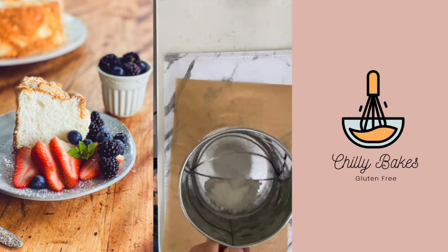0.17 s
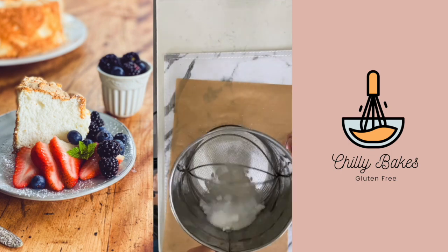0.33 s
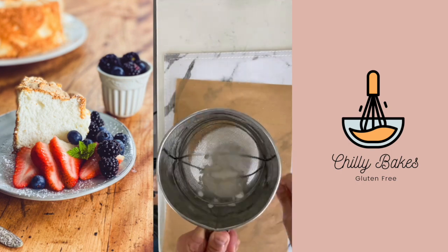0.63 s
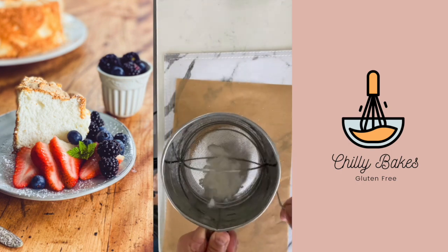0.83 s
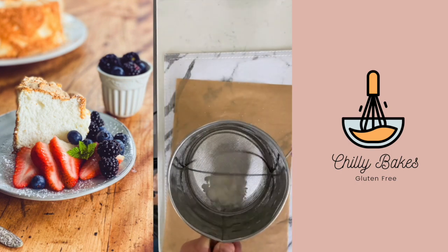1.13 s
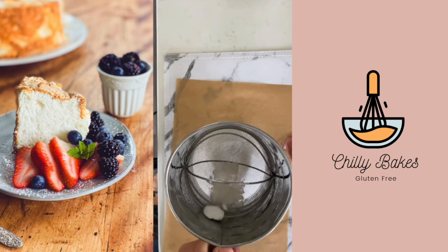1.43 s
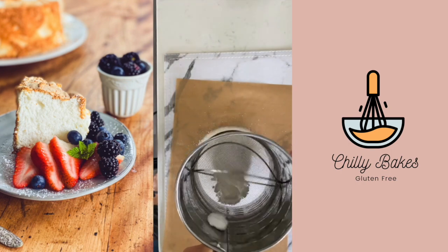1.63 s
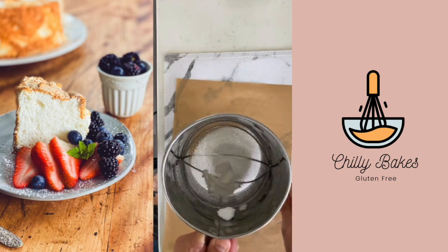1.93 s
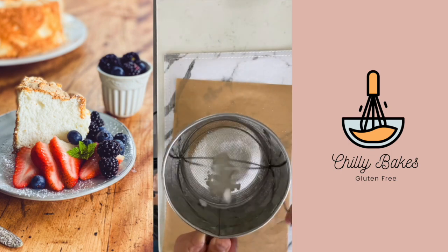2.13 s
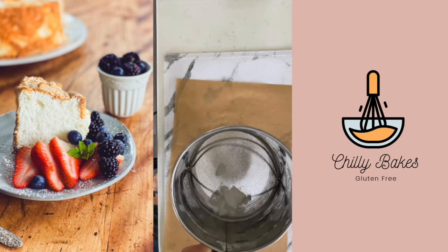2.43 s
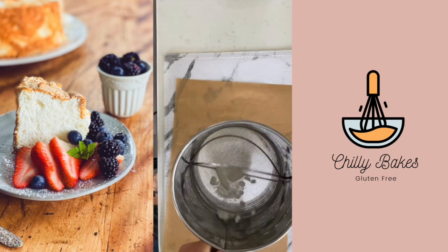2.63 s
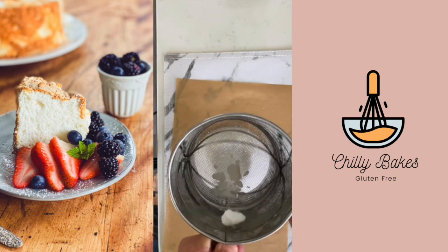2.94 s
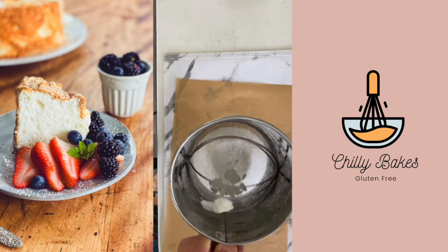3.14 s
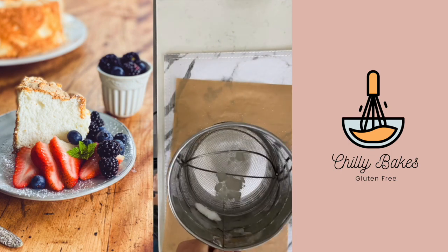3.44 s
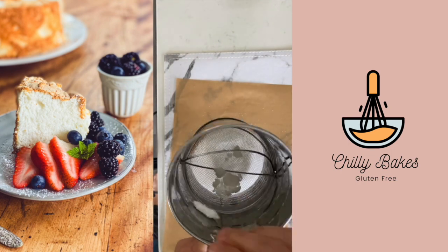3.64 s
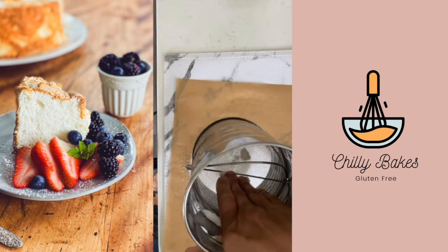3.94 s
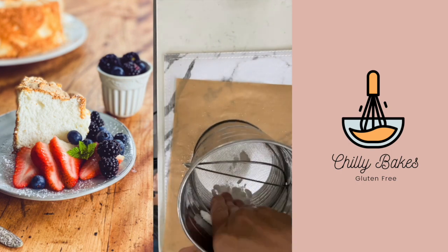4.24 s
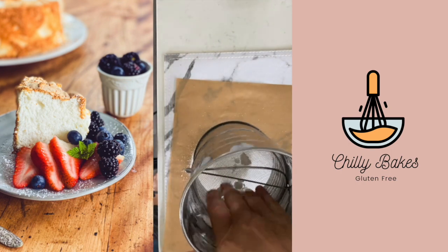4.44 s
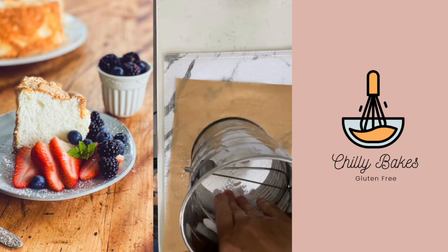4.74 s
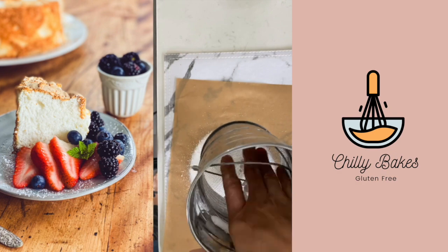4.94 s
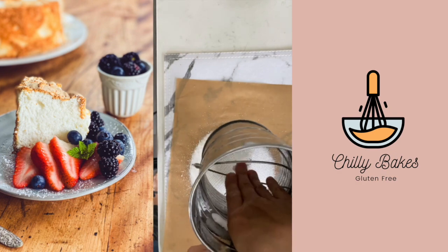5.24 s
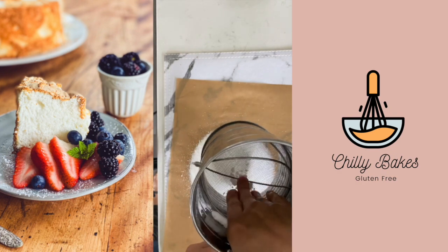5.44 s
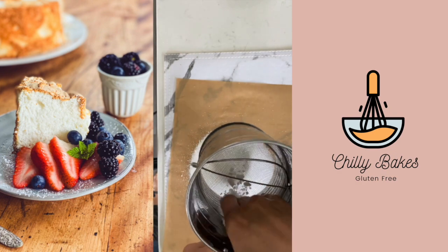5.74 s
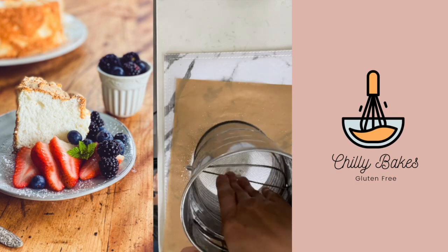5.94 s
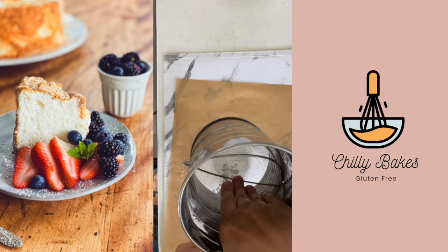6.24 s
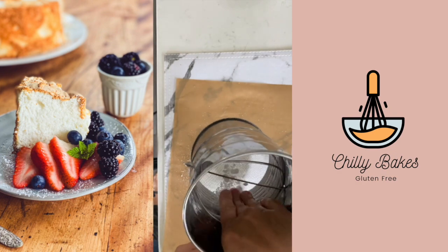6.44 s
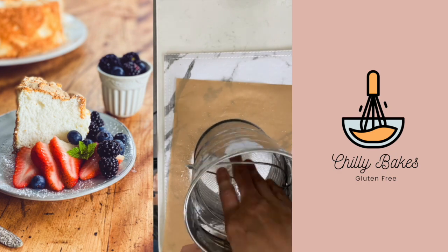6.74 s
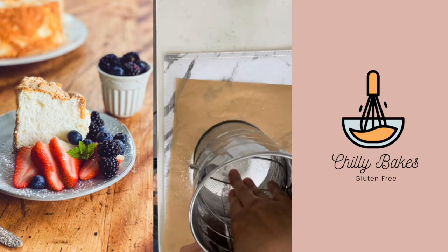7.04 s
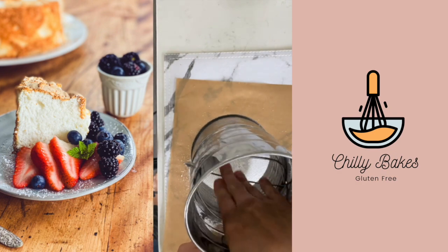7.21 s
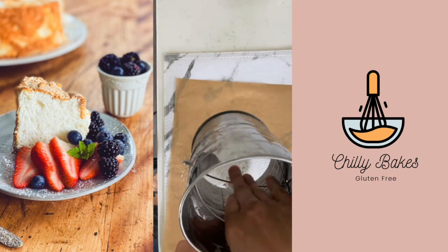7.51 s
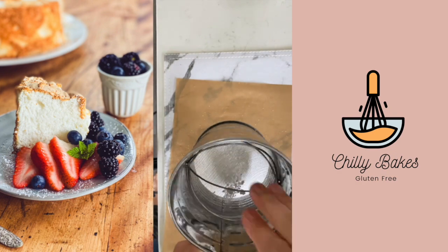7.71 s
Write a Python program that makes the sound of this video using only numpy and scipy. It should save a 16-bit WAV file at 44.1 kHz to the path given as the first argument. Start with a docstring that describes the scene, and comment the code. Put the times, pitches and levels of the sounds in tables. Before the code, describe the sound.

Close, bright hiss of sugar grains sliding in a tin sifter with dull knocks, followed by separate scratchy finger rubs on the mesh over low room hum.

```python
"""Granulated sugar in a tin flour sifter, heard close by over baking paper in a murmuring kitchen.
First the sifter is shaken: the sugar slides and surges over the wire mesh, with snaps and dull knocks.
Then a hand brushes down the inner wall and its fingers rub the rest through in short strokes.
Random grain impacts, coloured as mesh hiss, mesh scrape and paper patter, ring in the cup's resonances;
counter echoes and a room tail follow every sound of the sifter."""
import sys
import numpy as np
from scipy import signal
from scipy.fft import rfft, irfft, next_fast_len
from scipy.io import wavfile

SR = 44100
rng = np.random.default_rng(int(sys.argv[2]) if len(sys.argv) > 2 else 0)


def master(y):
    """Save y as 16-bit WAV."""
    cut = np.clip(np.atleast_2d(y).T, -1, 1)
    pcm = np.round(cut * 32767)  # scale
    wavfile.write(sys.argv[1], SR, pcm.astype(np.int16))


N = 347067
TIME = np.arange(N) / SR


def from_db(db):
    """Decibels to gain."""
    return 10 ** (np.asarray(db) / 20)


def rms_one(x):
    """Scale to unit power."""
    return x / np.sqrt(np.mean(x ** 2) + 1e-20)


def at_hz(points, hz):
    """Read a table on a log-frequency axis."""
    table_hz, value = np.transpose(points)
    return np.interp(np.log(np.maximum(hz, 1)), np.log(table_hz), value)


def colour(x, spectrum):
    """Causal (minimum-phase) filter that keeps the power of a white input; only the table's shape counts."""
    size = 2 * next_fast_len(N // 2 + SR // 10, True)
    gain = rms_one(from_db(at_hz(spectrum, np.fft.rfftfreq(size, 1 / SR))))
    # folding the cepstrum onto positive times gives the minimum phase
    cepstrum = irfft(np.log(gain))[:size // 2]
    cepstrum[1:] *= 2
    response = np.exp(rfft(cepstrum, size))
    return irfft(rfft(x, size) * response)[:N]


def drift(rate):
    """Random wander of unit power, joined by straight lines between `rate` new values a second."""
    return rms_one(np.interp(TIME * rate, np.arange(N), rng.standard_normal(N)))


def moving_shares(rate, count):
    """Randomly and quickly changing weights of unit total power, one for each path the sound can take."""
    shares = np.array([drift(rate) for _ in range(count)])
    return shares / np.linalg.norm(shares, axis=0)


# the kitchen's own murmur of air and appliances, as a spectrum shape: freq_hz, density_db
AIR_SPECTRUM = [(20, -18), (55, -16), (75, -13.5), (95, -5), (130, 4), (170, -1.5), (240, -4), (350, -11.5),
                (550, -21.5), (850, -18), (1500, -28), (4000, -25), (16000, -41)]
AIR_DB = -63.5
# narrow drones in the background: freq_hz, width_hz (of each of two filter passes), level_db
DRONES = [(100.2, 33, -65.5), (240, 24, -73), (692, 18, -79)]


def background():
    """Broad murmur of air with a few wavering drones, each a narrow band of noise."""
    out = from_db(AIR_DB) * colour(rng.standard_normal(N), AIR_SPECTRUM)
    for hz, width_hz, level_db in DRONES:
        b, a = signal.iirpeak(hz, hz / width_hz, fs=SR)
        once = signal.lfilter(b, a, rng.standard_normal(N))
        drone = signal.lfilter(b, a, once)
        out += from_db(level_db) * rms_one(drone)
    return out


def push(s, rise_s, hold_s, release_s):
    """Force that builds up to full at s, holds and dies away."""
    t = TIME - s
    build_up = (np.minimum(t, 0) / rise_s) ** 2
    die_away = np.maximum(t - hold_s, 0) / release_s
    return np.exp(-np.minimum(build_up + die_away, 20))


def forces(level_db, scrape_db, patter_db, shape):
    """One motion drives three sounds; rows: hiss, scrape, patter."""
    return np.outer(from_db(level_db + np.array([0, scrape_db, patter_db])), shape)


# Levels of sliding, surging and rubbing are before the trims in sifter() and the cup's resonances.
# how strongly the heap slides to and fro while the sifter is shaken: time_s, hiss_db
SLIDE = [(0.0, -37.5), (0.36, -33.5), (0.66, -39), (0.86, -38), (1.02, -40.5), (1.12, -31), (1.23, -37),
         (1.48, -36), (1.58, -57), (1.63, -43.5), (1.72, -39), (1.93, -39.5), (2.13, -39), (2.36, -34.5),
         (2.77, -35.5), (2.9, -41.5), (3.05, -41), (3.24, -36.5), (3.42, -44.5), (3.68, -74)]
SLIDE_SCRAPE_DB, SLIDE_PATTER_DB = -5.5, -14.5   # re the hiss
TOUCH_START_S, TOUCH_END_S, TOUCH_FADE_S = 3.95, 7.5, 0.04   # fingers stay on the sugar between strokes
TOUCH_DB, TOUCH_SCRAPE_DB, TOUCH_PATTER_DB = -59, -1, -20.5   # light drag; scrape and patter re the hiss
# grains loosened by a stroke keep running through: level re the stroke, die-away
SPILL_DB, SPILL_S = -15.5, 0.088


def loose_sugar():
    """The sliding heap; later the light drag of the fingers and the spill that outlasts each stroke."""
    slide_shape = from_db(np.interp(TIME, *np.transpose(SLIDE)))
    slide = forces(0, SLIDE_SCRAPE_DB, SLIDE_PATTER_DB, slide_shape)
    touch = push(TOUCH_START_S, TOUCH_FADE_S, TOUCH_END_S - TOUCH_START_S, TOUCH_FADE_S)
    drag = from_db(TOUCH_DB) * touch
    spill_power = 0
    for s, level_db, rise_s, hold_s, _ in RUBS:
        spill_power = spill_power + (from_db(level_db + SPILL_DB) * push(s, rise_s, hold_s, SPILL_S)) ** 2
    finger_shape = np.sqrt(drag ** 2 + spill_power)
    return np.hypot(slide, forces(0, TOUCH_SCRAPE_DB, TOUCH_PATTER_DB, finger_shape))


# each jerk of the sifter throws the heap across the mesh:
# full_force_s, hiss_db, hold_s, scrape_db (re the hiss)
SURGES = [(0.239, -32.5, .02, 1.5), (0.354, -31.5, 0.016, -1), (0.428, -26.5, .064, -6.5),
          (0.709, -34, 0.036, -5), (0.904, -26, 0.036, -7), (1.396, -32.5, 0.015, -2),
          (1.644, -23, 0.016, -5), (1.677, -24.5, 0.036, -8), (2.004, -31.5, .026, -1),
          (2.148, -34.5, 0.022, -1), (2.177, -29, .04, -7), (2.332, -30, 0.041, -14),
          (2.431, -29.5, 0.055, -9.5), (2.574, -31.5, 0.0057, -1.5), (2.658, -27.5, .01, -15),
          (2.672, -22, .028, -7.5), (2.822, -31, 0.016, -14), (2.942, -28, 0.029, -8),
          (3.065, -34, 0.044, -2), (3.112, -26.5, .022, -3.5), (3.317, -32.5, 0.011, -34),
          (3.395, -37.5, 0.022, -10.5)]
SURGE_RISE_S, SURGE_PATTER_DB = 0.0045, -15   # patter re the hiss
# finger strokes over the mesh: full_force_s, hiss_db, rise_s, hold_s, patter_db (re the hiss)
RUBS = [(3.758, -61, .012, 0.043, -16), (3.853, -55.5, 0.017, 0.041, -12),
        (3.949, -34.5, 0.0067, 0.049, -16), (4.115, -31, 0.048, 0.03, -16.5), (4.197, -36, .008, .02, -19),
        (4.23, -32, .01, 0.0063, -21.5), (4.313, -39.5, 0.058, 0.063, -20.5),
        (4.555, -33.5, 0.0008, 0.0035, -20.5), (4.61, -38.5, 0.0022, .015, -13),
        (4.65, -28.5, 0.023, .018, -8), (4.787, -49, 0.021, 0.097, -23), (4.923, -44, .004, 0.0037, -21),
        (5.051, -35.5, 0.0068, 0.014, -33), (5.152, -36.5, 0.01, 0.061, -20),
        (5.363, -42, 0.0027, 0.0089, -18), (5.409, -45, .006, 0.055, -29), (5.489, -33, 0.014, 0.0047, -14),
        (5.637, -37.5, .009, 0.1, -23.5), (5.819, -36, 0.012, 0.047, -39), (5.884, -42.5, .01, 0.027, -24),
        (5.962, -43, 0.0039, 0.043, -14), (6.087, -43, 0.013, 0.027, -19.5),
        (6.19, -40.5, 0.01, 0.044, -12.5), (6.329, -46, .003, 0.14, -20.5),
        (6.425, -28, 0.0066, 0.0043, -14), (6.452, -45, 0.0088, 0.015, -20),
        (6.790, -58, .003, 0.0046, -22), (6.844, -31.5, 0.0049, 0.0098, -20),
        (6.955, -39.5, .006, 0.051, -14.5), (7.014, -34, 0.026, .023, -11.5),
        (7.227, -34.5, 0.0049, 0.0079, -29.5), (7.295, -36.5, 0.018, .026, -27),
        (7.33, -28.5, 0.0024, .02, -12.5), (7.551, -44, 0.0023, .01, -2.5), (7.843, -56, 0.033, .005, -4.5)]
RUB_SCRAPE_DB = -5   # re the hiss
SETTLE_S = 0.010   # pushed grains come to rest


def pushed_sugar():
    """Surges of the heap and finger strokes, added in power."""
    power = 1e-18
    for s, level_db, hold_s, scrape_db in SURGES:
        shape = push(s, SURGE_RISE_S, hold_s, SETTLE_S)
        power += forces(level_db, scrape_db, SURGE_PATTER_DB, shape) ** 2
    for s, level_db, rise_s, hold_s, patter_db in RUBS:
        shape = push(s, rise_s, hold_s, SETTLE_S)
        power += forces(level_db, RUB_SCRAPE_DB, patter_db, shape) ** 2
    return np.sqrt(power)


def grains(force, per_s, spread_db, slip_db, slips_per_s=45, slip_s=0.0064):
    """Random impacts of uneven size; more force moves more grains, and the heap gives way in sudden slips."""
    rate = per_s * np.cbrt(force / force.mean())
    chance = np.clip(rate / SR, 1e-4, 1)   # of an impact in each sample
    size_db = spread_db * np.minimum(rng.exponential(1, N), 4)
    sizes = rms_one(from_db(size_db) * rng.standard_normal(N))
    # each slip starts at once and dies away over slip_s
    starts = (rng.random(N) < slips_per_s / SR) * rng.random(N)
    slips = signal.lfilter([1], [1, -np.exp(-1 / (slip_s * SR))], starts + 1e-18)
    unevenness = rms_one(np.sqrt(1 + from_db(slip_db) ** 2 * slips))
    hits = rng.random(N) < chance
    # rarer impacts are stronger, so that their rate leaves the power unchanged
    return force * unevenness * sizes * hits / np.sqrt(chance)


# resonances of the cup and its mesh: freq_hz, width_hz, open_lift_db, hand_inside_lift_db (before wandering)
CUP_RESONANCES = [(488, 97, 8, 3.5), (707, 93, 10.5, 5.5), (1086, 39, 6.5, 2), (1290, 16, -2.5, -0.5),
                  (1508, 73, 2, 6), (1666, 100, 10, 5.5), (1754, 44, 4.5, -4.5), (1848, 91, 4, 5),
                  (1976, 22, 6.5, 3), (2583, 170, 2, -1), (2610, 130, 2, 6), (2800, 67, 2.5, 5.5),
                  (3390, 26, 0.5, -11), (3600, 56, 6, 6.5), (3848, 81, 7, 4), (4020, 70, -0.5, -1.5),
                  (4137, 166, 6.5, 7), (4590, 65, 3, 0.5), (5490, 120, 0.5, 4), (6610, 69, 3, 4),
                  (9580, 120, 3.5, -2), (12900, 430, 3, -1)]


def cup(x, hand, flare_db):
    """Narrow bands lifted or dipped, each lift wandering at random throughout; the hand shifts their balance."""
    for hz, width_hz, open_db, damped_db in CUP_RESONANCES:
        b, a = signal.iirpeak(hz, hz / width_hz, fs=SR)
        lift_db = open_db + hand * (damped_db - open_db) + flare_db * drift(rate=8.3)
        x = x + signal.lfilter(b, a, (from_db(lift_db) - 1) * x + 1e-18)
    return x


# spectrum shape of fine grains ticking on the wires: freq_hz, density_db
HISS_SPECTRUM = [(100, -34), (700, -18.5), (1500, -8.5), (2600, -3.5), (3100, -1), (4000, 0.5),
                 (5000, -0.5), (7000, 0), (10000, -1.5), (14000, -1.5), (15800, -4)]
# spectrum shape of the heap scraping the whole mesh: freq_hz, density_db
SCRAPE_SPECTRUM = [(100, -35), (600, -29), (1000, -8.5), (1350, 1), (1700, 1.5), (2100, -2), (2700, -5),
                   (3300, -13), (4200, -20), (8000, -24)]
# spectrum shape of grains landing on the paper below: freq_hz, density_db
PATTER_SPECTRUM = [(30, -31), (80, -5.5), (160, -6.5), (250, -1.5), (320, -2), (430, -1), (800, -2.5),
                   (1200, 1.5), (2200, -8), (8000, -31)]
HAND_IN_S, HAND_REACH_S = 3.5, 0.17   # the hand reaches into the cup: start, time taken


def sifter():
    """Rasp on the mesh and patter on the paper, heard through the cup."""
    hiss_flow, scrape_flow, patter_flow = loose_sugar()
    hiss_push, scrape_push, patter_push = pushed_sugar()
    surge_force = hiss_push * from_db(-0.5)
    scrape_force = np.hypot(scrape_flow, scrape_push) * from_db(-6)
    patter_force = np.hypot(patter_flow, patter_push) * from_db(-3)
    trickle = grains(hiss_flow, per_s=11000, spread_db=0.6, slip_db=6.5)
    surge = grains(surge_force, per_s=13000, spread_db=-0.5, slip_db=5.0, slips_per_s=110, slip_s=0.0062)
    scrape = grains(scrape_force, per_s=4000, spread_db=2.5, slip_db=5.5)
    patter = grains(patter_force, per_s=7000, spread_db=1.74, slip_db=-1.5)
    sugar = colour(trickle + surge + snaps(), HISS_SPECTRUM)
    sugar = sugar + colour(scrape, SCRAPE_SPECTRUM) + colour(patter, PATTER_SPECTRUM)
    hand = np.clip((TIME - HAND_IN_S) / HAND_REACH_S, 0, 1)   # 0 outside, 1 inside
    return cup(sugar, hand, flare_db=1.8)


# sharp contacts of heap, fingertips and stirring wire with the mesh:
# start_s, level_db (before the hiss colour and the cup), die_away_s
SNAPS = [(0.424, -19, 0.0032), (.902, -32, 0.0016), (3.060, -35, 0.0026), (3.120, -30, 0.0028),
         (3.311, -35, .003), (4.556, -42, 0.0033), (4.655, -15, 0.0042), (5.409, -41, .003),
         (5.486, -29.5, 0.0033), (5.993, -33, 0.0011), (6.327, -42, .003), (6.419, -23, 0.0055),
         (7.332, -19.5, 0.0012), (7.559, -27, 0.001), (7.753, -45.5, 0.0014), (7.845, -52, 0.0049)]


def snaps():
    """Each contact crushes a few grains at once: an instant crack that dies within milliseconds."""
    t = TIME[:SR // 20]
    out = np.zeros(N + len(t))
    for s, level_db, decay_s in SNAPS:
        start = int(s * SR)
        crack = np.exp(-t / decay_s) * rng.standard_normal(len(t))
        out[start:start + len(t)] += from_db(level_db) * crack
    return out[:N]


# dull knocks as the cup is jerked or handled: start_s, level_db (before the mode levels and spread)
KNOCKS = [(0.906, -52), (1.646, -50), (1.702, -37), (2.009, -41), (2.179, -40.5), (2.944, -44), (3.12, -36),
          (4.656, -48), (6.421, -47), (6.895, -46.5), (7.847, -47)]
# low modes of the hand-held cup: freq_hz, level_db (re the knock), t60_s
BODY_MODES = [(132, -9.5, 0.21), (172, -12, 0.18), (246, -4, 0.1), (310, -10, .08), (485, -2.5, 0.061),
              (563, -22.5, 0.037)]


def knocks(spread_db):
    """Every jolt sets the cup's low modes ringing, each with a strength of its own."""
    s, knock_db = np.transpose(KNOCKS)
    starts = np.minimum((s * SR).astype(int), N - 1)
    uneven_db = spread_db * rng.standard_normal((len(s), len(BODY_MODES)))
    strengths = from_db(knock_db[:, None] + uneven_db)
    out = np.zeros(N)
    for (hz, level_db, t60_s), strength in zip(BODY_MODES, strengths.T):
        clicks = np.zeros(N)
        clicks[starts] = strength * from_db(level_db)
        # two-pole resonator: a decaying sine after every click
        r, w = np.exp(-np.log(1000) / (t60_s * SR)), 2 * np.pi * hz / SR
        out += signal.lfilter([0, np.sin(w)], [1, -2 * r * np.cos(w), r * r], clicks + 1e-18)
    return out


# fingers brushing along the inner wall as the hand goes in: time_s, level_db
BRUSH = [(3.74, -89), (3.78, -59), (3.83, -73), (3.88, -69), (3.93, -66), (3.95, -90)]


def wall_brush(hz, width_hz):
    """Skin on tin is soft and stirs only one resonance of the cup: noise through a narrow band, twice."""
    b, a = signal.iirpeak(hz, hz / width_hz, fs=SR)
    once = signal.lfilter(b, a, rng.standard_normal(N))
    ring = signal.lfilter(b, a, once)
    level = from_db(np.interp(TIME, *np.transpose(BRUSH)))
    brushing = (TIME > BRUSH[0][0]) * (TIME < BRUSH[-1][0])
    return level * rms_one(ring) * brushing


def counter_echoes(x, decay_s, level_db, count=6):
    """Quick reflections between cup and counter smear each tick; their pattern shifts at random throughout."""
    t, out = TIME[:SR // 30], x
    for share in moving_shares(22, count):
        echoes = rng.standard_normal(len(t)) * np.exp(-t / decay_s) * (t > 0.0004)
        echoes = echoes / np.linalg.norm(echoes)
        out = out + from_db(level_db) * signal.oaconvolve(x * share, echoes)[:N]
    return out


# reverberation time of the kitchen: freq_hz, t60_s
ROOM_T60 = [(150, 0.41), (1500, 0.46), (4000, 0.51), (8000, 0.45), (15000, 0.34)]


def kitchen(x, rise_s, level_db, count=4):
    """A diffuse tail whose top treble dies first; the mix of several tails shifts at random throughout."""
    t, out = TIME[:SR * 3 // 5], 0
    hz, edges = np.fft.rfftfreq(len(t), 1 / SR), np.geomspace(60, 18000, 10)
    for share in moving_shares(12, count):
        white = rfft(rng.standard_normal(len(t)))
        tail = np.zeros(len(t))
        for lo, hi in zip(edges, edges[1:]):
            band = irfft(white * (hz >= lo) * (hz < hi), len(t))
            t60_s = at_hz(ROOM_T60, np.sqrt(lo * hi))
            tail += band * np.exp(-np.log(1000) * t / t60_s)
        tail = tail * np.minimum(t / rise_s, 1)   # the tail swells in
        out = out + signal.fftconvolve(x * share, tail / np.linalg.norm(tail))[:N]
    return from_db(level_db) * out


def scene():
    """The sifter close by, the room around it and its low background."""
    # the small cup radiates almost no deep bass
    no_deep_bass = signal.butter(3, 130, "high", fs=SR, output="sos")
    thuds = signal.sosfilt(no_deep_bass, knocks(spread_db=0.5))
    direct = sifter() + thuds + wall_brush(hz=1690, width_hz=160)
    near = counter_echoes(direct, decay_s=0.004, level_db=-8.0)
    room = kitchen(near, rise_s=0.014, level_db=-8.5)
    return (near + room + background())[None]


CUTOFF_HZ = 15800


def record(dry):
    """One channel whose top is cut steeply by an elliptic low-pass."""
    low_pass = signal.ellip(12, 0.1, 80, CUTOFF_HZ, fs=SR, output="sos")
    return signal.sosfilt(low_pass, dry)


dry = scene()
out = record(dry)
master(out)
```